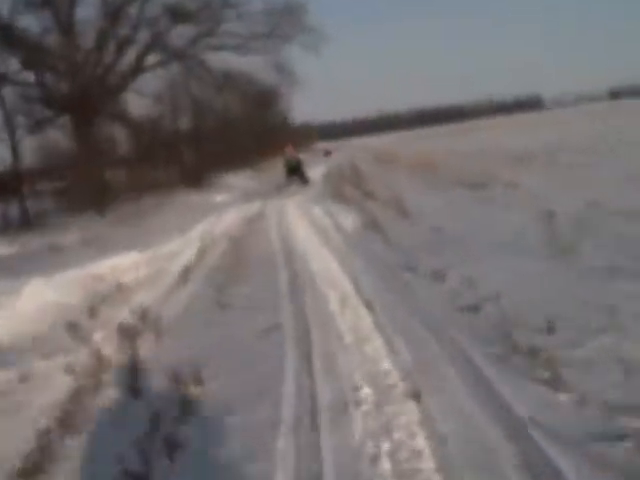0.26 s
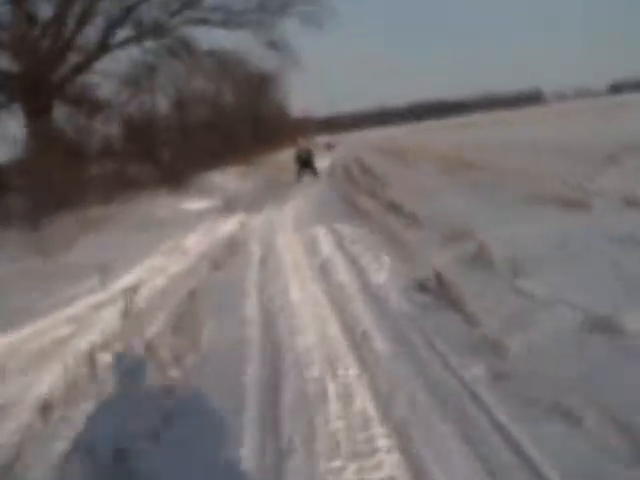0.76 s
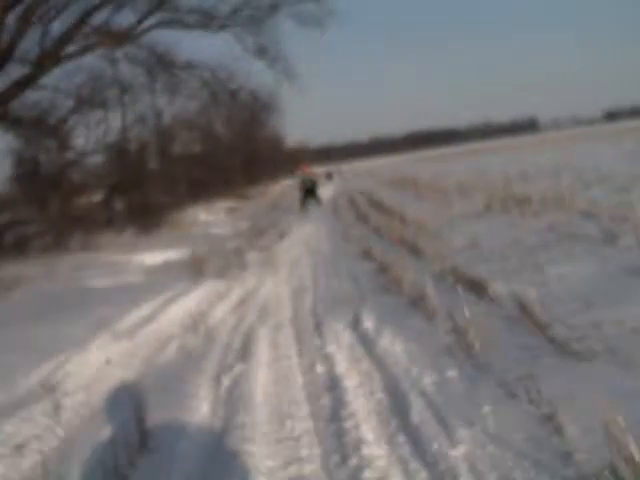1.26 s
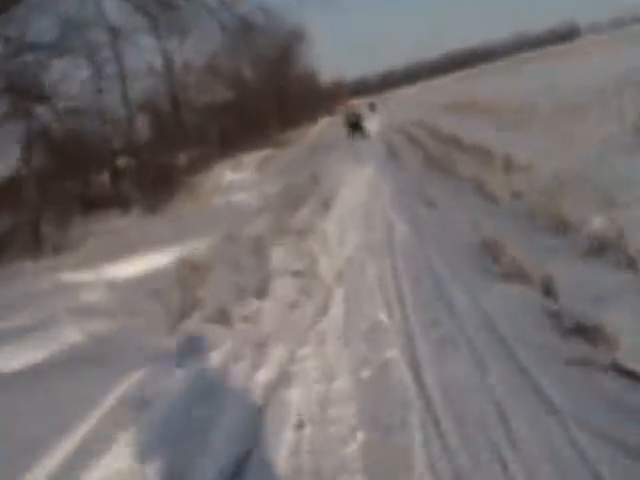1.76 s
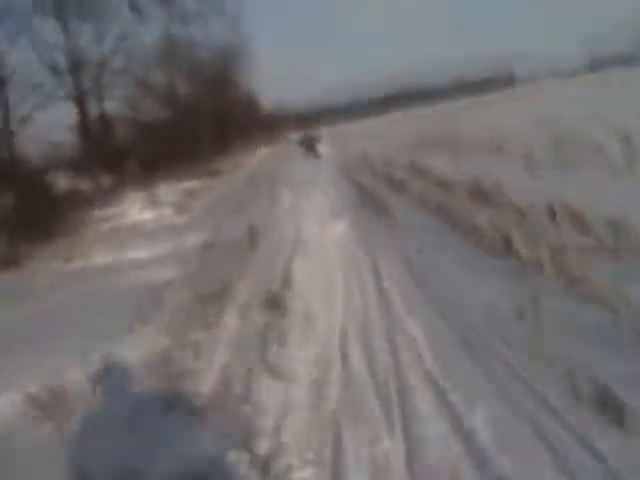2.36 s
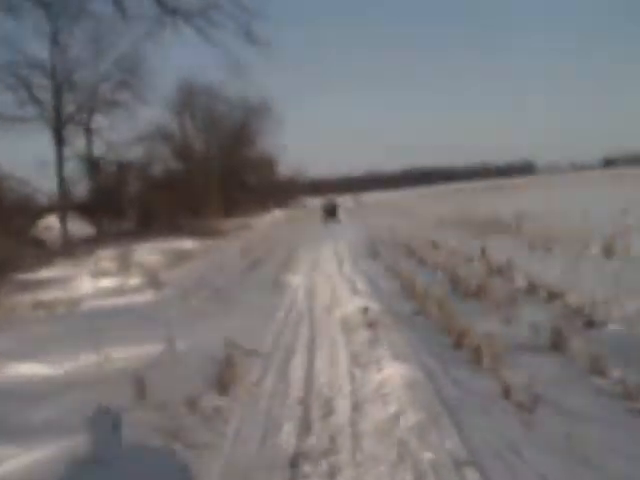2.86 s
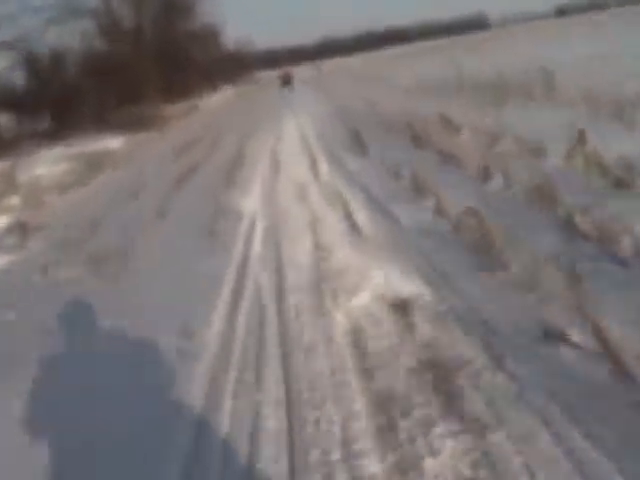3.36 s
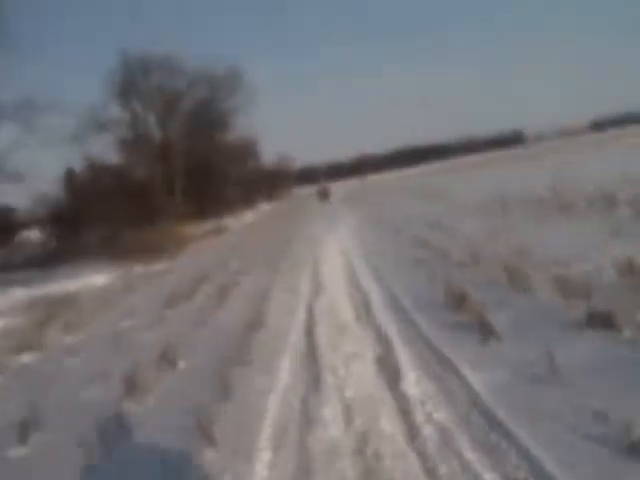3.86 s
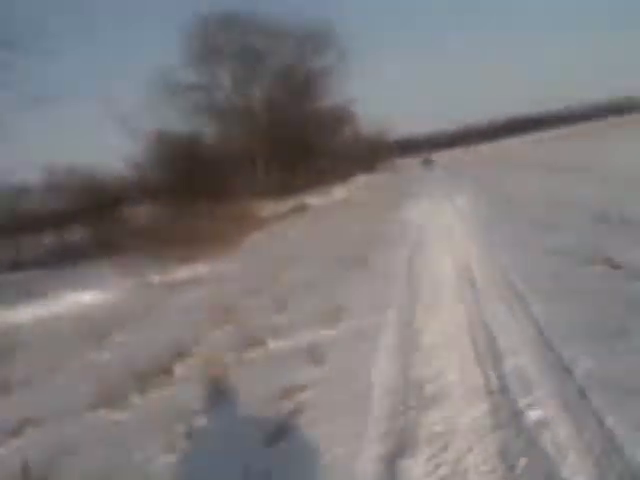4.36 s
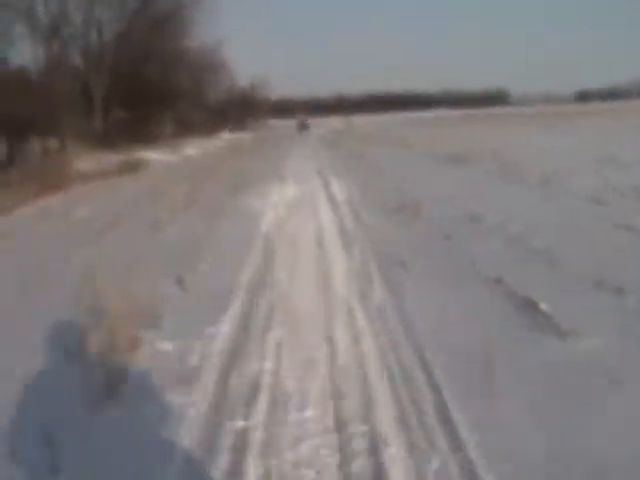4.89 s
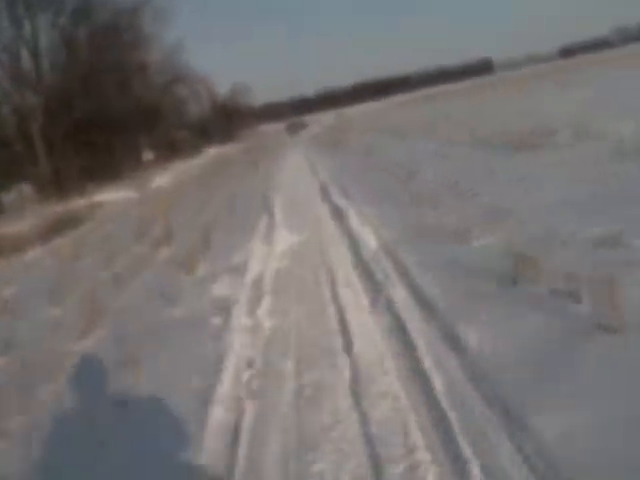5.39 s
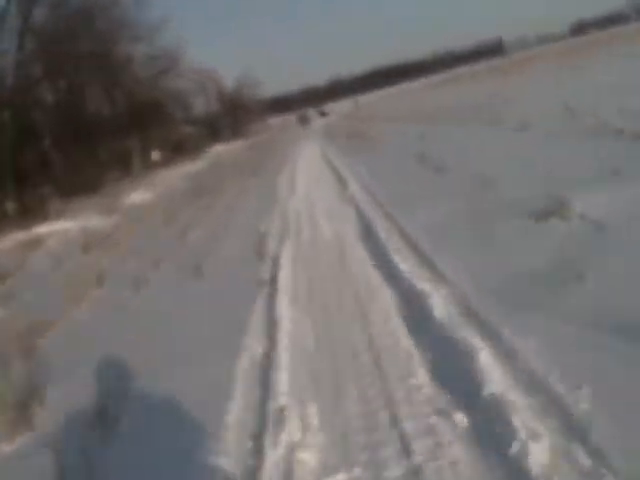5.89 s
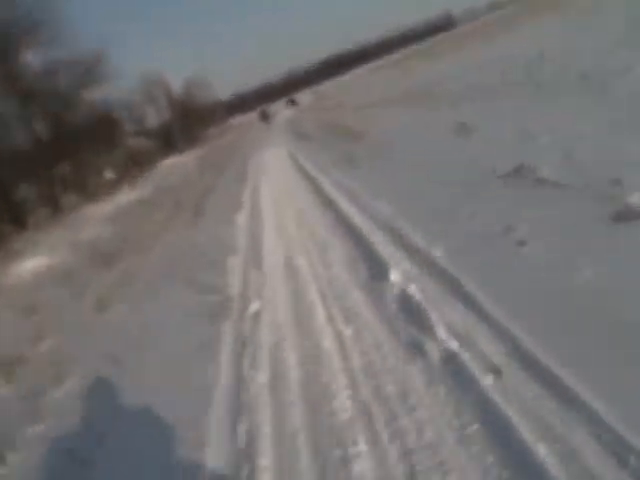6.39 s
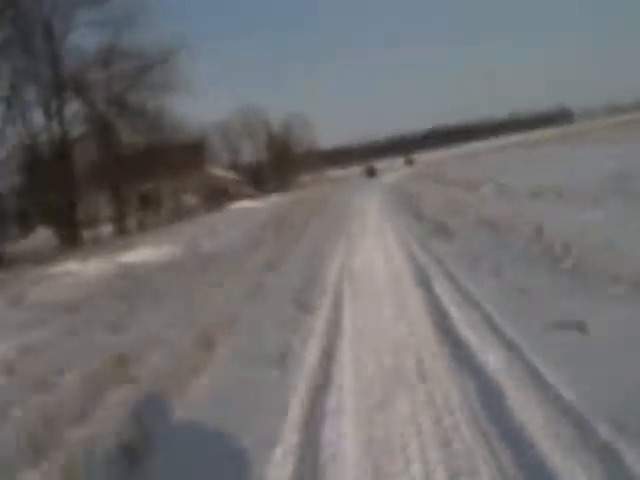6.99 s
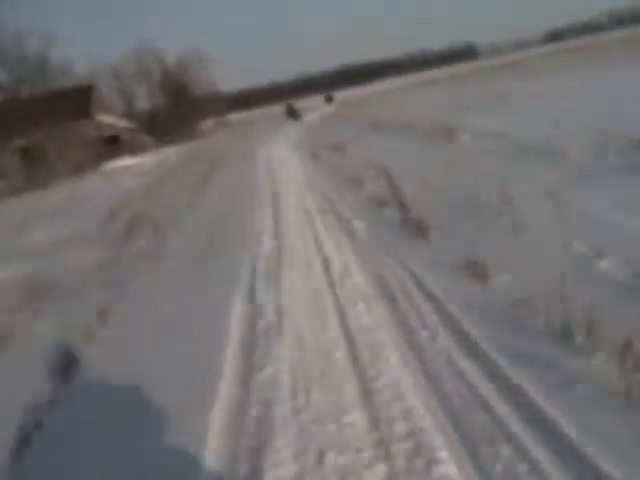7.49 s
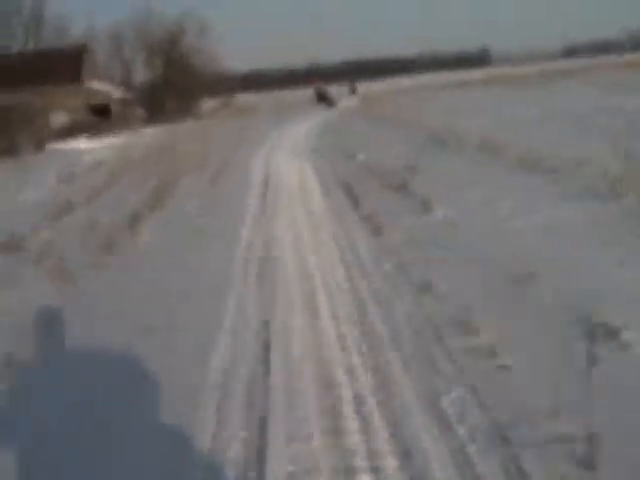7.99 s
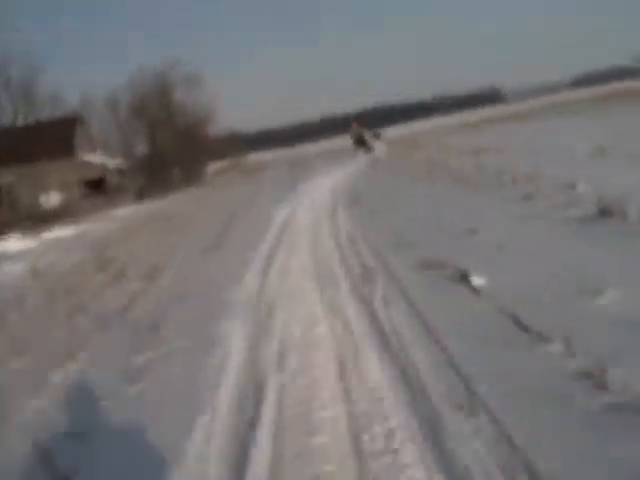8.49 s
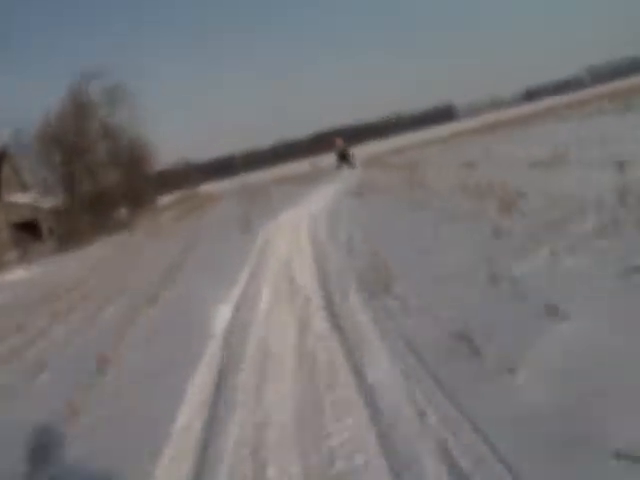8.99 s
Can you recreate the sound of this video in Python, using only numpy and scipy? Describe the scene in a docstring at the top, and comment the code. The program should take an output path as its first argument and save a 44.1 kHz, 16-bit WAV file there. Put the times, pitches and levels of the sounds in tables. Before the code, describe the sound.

Rider's-seat snowmobile: a steady nasal engine drone, low wind buffeting, track whine climbing through two hard revs, then throttle closed and gusty coasting.

```python
"""A rasping two-cylinder two-stroke snowmobile cruises, revs hard twice and coasts, heard from the rider's seat.
The engine is a sum of firing orders on one crank phase, with drive-train noise pulsed at each firing.
Wavering tones make the whine of the track lugs and of the gears; shaken resonators make the bumps.
Coloured noise makes the snow hiss and the wind, which buffets a small microphone with ticks among it.
The recorder's input rounds off the highest peaks and limits the band."""
import sys
import numpy as np
from scipy import signal
from scipy.fft import rfft, irfft, next_fast_len
from scipy.io import wavfile
from scipy.ndimage import uniform_filter1d

SR = 44100
rng = np.random.default_rng(int(sys.argv[2]) if len(sys.argv) > 2 else 0)


def bounce(signal):
    """Save signal as a 16-bit WAV file at the path given by the first command-line argument."""
    frames = np.transpose(np.atleast_2d(signal))
    limited = np.clip(frames, -1, 1)
    pcm = np.round(limited * 32767).astype(np.int16)
    wavfile.write(sys.argv[1], SR, pcm)


N = 407925
STEP = 64  # samples between control values
CONTROL_S = np.arange(0, N + STEP, STEP) / SR

# level of the drive-train rasp, which the snow hiss, buzz and whine octave follow: start_s, level_db
DRIVE_LEVEL = [(0.1, -51.5), (0.57, -48.5), (1.18, -50), (1.87, -53), (2.15, -43.5), (2.36, -42.5),
               (2.42, -48), (3.3, -47), (3.67, -45), (5.3, -46), (5.45, -47), (5.6, -43), (5.72, -45.5),
               (5.92, -45.5), (5.98, -42), (6.1, -42), (6.35, -39), (6.42, -34.5), (6.52, -35.5),
               (6.8, -43), (7.1, -48), (7.68, -47), (7.73, -39.5), (7.87, -40), (7.91, -45), (7.98, -47.5),
               (8.4, -49), (8.55, -49.5), (8.6, -52.5), (8.95, -53), (9.2, -54.5)]
USUAL_DRIVE_DB = -45


def gain_of(db):
    """Logarithmic level: decibels to amplitude."""
    return 10 ** (np.asarray(db) / 20)


def evened(x):
    """Power normalisation: scales to rms 1."""
    return x / np.sqrt(np.mean(x ** 2) + 1e-20)


def fine(control):
    """Linear interpolation from control values to one value per sample."""
    return np.interp(np.arange(N) / STEP, np.arange(len(control)), control)


def curves(rows):
    """Linear interpolation of a table's columns over time, at control rate."""
    s, *columns = np.transpose(rows)
    return [np.interp(CONTROL_S, s, column) for column in columns]


def drive_over_usual():
    """Relative level in dB of the drive-train, a measure of load."""
    return curves(DRIVE_LEVEL)[0] - USUAL_DRIVE_DB


def drift(per_s):
    """Slow random interpolation between independent normal values, of expected rms about 1, at control rate."""
    count = int(N / SR * max(per_s, 1)) + 3
    at = CONTROL_S * SR / (N + STEP) * (count - 1)
    values = np.interp(at, np.arange(count), rng.standard_normal(count))
    return values * np.sqrt(3 / 2)  # interpolation lowers the power to two thirds


def swells(rows, rise_s, fall_s, rest_db):
    """Exponential growth and decay in dB: powers add to a rest; each swell takes rise_s and fall_s per 10 dB."""
    s, peak_db = np.transpose(rows)[..., None]
    late = CONTROL_S - s
    away = np.where(late < 0, -late / rise_s, late / fall_s)
    power = gain_of(peak_db - 10 * away) ** 2
    return 10 * np.log10(gain_of(rest_db) ** 2 + power.sum(0))


def fade(from_s, to_s):
    """Linear gain from zero at from_s to one at to_s, in either direction."""
    return np.clip((np.arange(N) / SR - from_s) / (to_s - from_s), 0, 1)


def colour(points, hz):
    """Spectral envelope: gain at hz on a logarithmic frequency scale, -90 dB beyond its ends."""
    f, db = np.transpose(points)
    return gain_of(np.interp(np.log(hz + 1), np.log(f + 1), db, left=-90, right=-90))


def noise(points, gate=1, from_hz=0):
    """Spectral shaping of white noise, gated first and then coloured, to rms 1 above from_hz."""
    size = next_fast_len(N)
    hz = np.fft.rfftfreq(size, 1 / SR)
    spectrum = rfft(rng.standard_normal(N) * gate, size) * colour(points, hz)
    power = abs(spectrum) ** 2
    share = np.sum(power[hz >= from_hz]) / np.sum(power)
    return evened(irfft(spectrum, size)[:N]) / np.sqrt(share)


def wind():
    """Turbulent pressure: limited slow swings on the membrane, a lumpy roar and gusts that flutter."""
    # roar of the wind: start_s, level_db
    roar_level = [(0.0, -32), (0.35, -37), (0.65, -41), (1.0, -36), (1.8, -36), (2.05, -30), (2.27, -23),
                  (2.37, -27), (2.42, -32), (3.4, -34), (4.6, -33), (4.75, -29.5), (5.6, -33), (6.3, -30),
                  (6.48, -20), (6.62, -29), (6.9, -31), (7.3, -31), (7.45, -27), (7.62, -28), (7.78, -29),
                  (7.87, -24), (7.97, -30), (8.2, -31), (8.64, -35), (8.75, -27), (8.95, -32), (9.2, -30)]
    # spectrum of the slow swings: frequency_hz, density_db (per Hz)
    swing_colour = [(1.2, 4), (3, 6), (4.7, 5), (9, 0), (18, -6.5), (26, -11), (36, -15), (50, -24),
                    (70, -46.5)]
    # spectrum of the roar: frequency_hz, density_db (per Hz)
    roar_colour = [(45, 0.5), (100, -2), (160, -6.5), (300, -12), (500, -18.5), (800, -24), (1500, -35),
                   (3000, -50.5), (5000, -62.5), (7000, -79.5)]
    # buffets that shove the membrane, before its limit: peak_s, peak_db
    buffets = [(0.06, -2), (0.44, -23), (0.67, -21.5), (0.95, -17.5), (1.36, -20), (1.81, -16), (2.1, -17),
               (2.32, -7.5), (2.47, -16), (2.76, -8), (3.06, -11.5), (3.24, -15.5), (3.7, -10),
               (4.03, -11.5), (4.26, -9), (4.72, -13), (5.05, -9), (5.45, -8), (5.94, -14.5), (6.19, -13),
               (6.55, -10.5), (6.86, -14.5), (7.01, -10.5), (7.26, -10), (7.52, -7), (7.67, -13),
               (8.05, -11), (8.21, -11.5), (8.53, -12.5), (8.71, -14.5), (9.05, -14.5)]
    # gusts across the microphone while coasting: peak_s, peak_db
    gust_peaks = [(7.92, -36), (8.121, -24.5), (8.16, -31), (8.27, -37), (8.37, -28.5), (8.43, -29),
                  (8.5, -31), (8.743, -27), (8.79, -31), (8.84, -36), (9.03, -32), (9.12, -33), (9.18, -35)]
    # spectrum of the gusts: frequency_hz, density_db (per Hz)
    flutter_colour = [(120, -0.5), (170, 0.5), (330, -3), (600, -13), (900, -21), (1600, -38), (3000, -46),
                      (4500, -47.5), (6000, -73)]
    membrane = .65  # the farthest the swings push the membrane

    buffet_db = swells(buffets, rise_s=0.21, fall_s=0.17, rest_db=-24)
    swings = noise(swing_colour)
    swings /= np.sqrt(uniform_filter1d(swings ** 2, size=14000) + 0.008)  # the swings never rest for long
    pushed = membrane * np.tanh(fine(gain_of(buffet_db)) * swings / membrane)

    roar_db = curves(roar_level)[0] + 2.65 * drift(30)
    roar = fine(gain_of(roar_db)) * noise(roar_colour)

    gust_db = swells(gust_peaks, rise_s=.008, fall_s=0.071, rest_db=-36) + 2.0 * drift(40)
    gusts = fine(gain_of(gust_db)) * noise(flutter_colour) * fade(7.85, 7.95)
    return pushed + roar + gusts


def ticks():
    """Impulse response: each faint tick is a very short tone burst under a Gaussian envelope."""
    # ticks: start_s, peak_db
    tick_peaks = [(1.916, -42), (1.932, -43), (2.151, -41), (2.169, -31), (2.3717, -32), (2.378, -32),
                  (2.382, -29), (2.388, -40), (2.392, -41), (3.047, -33.5), (5.425, -36), (6.427, -27),
                  (6.562, -24), (6.565, -33), (6.570, -30), (6.574, -29), (7.051, -32), (7.372, -33),
                  (7.485, -34), (8.074, -35)]
    impulses = np.zeros(N)
    s, db = np.transpose(tick_peaks)
    impulses[(s * SR).astype(int)] = gain_of(db)
    u = np.linspace(-.001, .001, 89)  # s
    click = np.cos(2 * np.pi * 3800 * u) * np.exp(-(u / .00006) ** 2)
    return np.convolve(impulses, click, "same")


def snow():
    """Broadband friction noise: spray and sliding skis hiss louder as the drive works harder."""
    # spectrum of the hiss: frequency_hz, density_db (per Hz)
    hiss_colour = [(2500, -5), (3500, -1.5), (4200, -2.5), (5200, 1.5), (6300, -2.5), (7200, -8),
                   (8400, -13), (9000, -14)]
    hiss_db = -66 + 1.21 * drive_over_usual() + .8 * drift(25)
    return fine(gain_of(hiss_db)) * noise(hiss_colour, from_hz=4000)


def gear():
    """Frequency modulation: a faint, thin gear whine that wavers and follows ground speed."""
    # gear whine: start_s, pitch_hz, level_db
    gear_whine = [(0.7, 907, -62.5), (1.0, 905, -50.5), (1.5, 890, -52), (1.8, 870, -61.5), (3.2, 825, -60),
                  (3.45, 848, -54), (3.9, 868, -52), (4.3, 895, -56), (4.62, 906.5, -53), (4.9, 941, -54),
                  (5.4, 930.7, -53), (5.55, 940.4, -70)]
    hz, whine_db = curves(gear_whine)
    phase = 2 * np.pi * np.cumsum(fine(hz * (1 + .003 * drift(20)))) / SR
    whine = np.sqrt(2) * fine(gain_of(whine_db + 2.5 * drift(9))) * np.cos(phase)
    return whine * fade(.6, 0.8) * fade(5.6, 5.55)


def chassis():
    """Modal resonance: lumpy shaking on rough snow rings the low panel modes."""
    # chassis bumps: peak_s, peak_db
    bumps = [(1.3, -30), (1.42, -28.5), (1.81, -27), (1.94, -33.5), (2.09, -21.5), (2.18, -22),
             (2.27, -22.5), (2.38, -27), (2.49, -30.5), (2.61, -29.5), (2.75, -31), (3.36, -43),
             (4.52, -24.5), (5.09, -29), (5.26, -29)]
    # panel modes: frequency_hz, width_hz (of each of two filter passes), level_db (relative)
    modes = [(221, 42, 10.5), (275, 49, -7)]
    shake = rng.standard_normal(N) * fine(gain_of(2.5 * drift(25)))
    ring = 0
    for hz, width, db in modes:
        b, a = signal.iirpeak(hz, hz / width, SR)
        once = signal.lfilter(b, a, shake)
        ring = ring + gain_of(db) * evened(signal.lfilter(b, a, once))
    bump_db = swells(bumps, rise_s=0.033, fall_s=0.08, rest_db=-48)
    return fine(gain_of(bump_db)) * evened(ring) * fade(.9, 0.94) * fade(5.6, 5.4)


def track():
    """Periodic contact: lugs passing the drive sprocket give a wavering whine and its octave."""
    # track lugs: start_s, pitch_hz (lug rate), level_db (of the whine)
    lugs = [(0.06, 190.9, -37), (0.5, 200.9, -40), (1.2, 206.7, -39), (1.75, 197.8, -36), (2.5, 191.5, -30),
            (2.9, 189.2, -30.5), (3.4, 192.1, -40), (4.1, 204.4, -36.5), (4.7, 215.2, -46),
            (5.5, 220.7, -35.5), (5.8, 243, -44), (6.0, 247.5, -33), (6.35, 298.6, -22),
            (6.7, 348.5, -29.5), (6.9, 353.7, -27), (7.2, 314.6, -32.5), (7.5, 314, -41), (7.85, 365, -30),
            (8.05, 326.6, -37.5), (8.4, 314.5, -35.5), (8.7, 290.4, -48)]
    hz, whine_db = curves(lugs)
    octave_db = -41 + 1.3 * drive_over_usual()
    octave_db = octave_db - 0.17 * np.maximum(hz - 215, 0)  # dB per Hz of lug rate above 215 Hz
    phase = 2 * np.pi * np.cumsum(fine(hz * (1 + 0.0039 * drift(30)))) / SR
    whine = fine(gain_of(whine_db + 2.6 * drift(12))) * np.cos(phase)
    octave = fine(gain_of(octave_db + 2.6 * drift(9.2))) * np.cos(2 * phase)
    return np.sqrt(2) * (whine + octave) * fade(8.7, 8.5)


def rasp(turns, running):
    """Amplitude modulation: drive-train noise puffs at each firing, more deeply under load."""
    # spectrum of the rasp: frequency_hz, density_db (per Hz)
    rasp_colour = [(200, -1), (400, -0.5), (600, -5.5), (900, -7.5), (1300, -11), (1700, -13.5),
                   (2150, -17), (2300, -20), (2600, -22.5), (3200, -30.5), (3800, -45.5), (4500, -61.5)]
    puff = .3  # decay of each puff, in firing intervals
    depth = fine(np.clip(0.2 + .035 * drive_over_usual(), 0, 1)) * running
    pulse = np.exp(-(turns % 1) / puff) / puff
    gate = 1.5 + depth * (pulse - 1)
    rasp_db = curves(DRIVE_LEVEL)[0] - 1 + 1.2 * drift(14)
    return fine(gain_of(rasp_db)) * noise(rasp_colour, gate, from_hz=1150)


def missed():
    """Interrupted excitation in dB: a short rounded dip at each missed firing; depth 0 leaves the level unchanged."""
    # missed firings: middle_s, length_s, depth_db (0 for no dip)
    misfires = [(1.675, .017, -5), (1.82, .02, -11), (2.074, .022, -12), (2.175, 0.012, -13),
                (2.68, 0.013, -9), (3.666, .012, 0), (5.08, .011, -16), (5.275, .01, -10),
                (6.222, .025, -2.5)]
    s, length, depth_db = np.transpose(misfires)[..., None]
    late = (CONTROL_S - s) / length
    return (depth_db * np.exp(-(2 * late) ** 4)).sum(0)


def tone_spells():
    """Time-varying source spectrum: gains and tilts that hold through each spell of changed engine tone."""
    # spells of changed engine tone: start_s, end_s, onset_s, bark_db, buzz_db, boom_db, third_order_db,
    # bark_tilt_db_per_khz, snarl_db_per_khz
    spells = [(0.0, 0.39, 0.097, 7.5, 4, -0.5, -1, 4, 0), (1.872, 1.925, .015, 5.5, -6, 4, -3, -5, 0),
              (1.945, 2.066, .015, 9.5, -5, 10, -2, -5, 0), (3.095, 3.657, .02, 7, 3, -3.5, 0, 5, -1),
              (4.951, 5.457, 0.1, 2, -2.5, -1.5, 0, 8, -3.5),
              (5.48, 5.565, 0.084, 5.5, 0.5, -2, -2.5, 3, -3), (5.613, 5.74, 0.044, 7.5, -5, -1, -2, 7, 1),
              (5.8, 5.94, .06, 3.5, -2, 0, -2.5, -12, 2), (5.951, 6.205, 0.054, 5, 3, -2.5, -1.5, -8, 1),
              (6.236, 6.373, .05, 3.5, 4, 3, 0.5, -29, -6), (6.386, 6.6, .08, 4, 8, 1.5, 1, -1, 0.5),
              (6.62, 7.002, 0.075, 0, 1.5, 2, 0.5, -14, 0), (7.18, 7.5, .08, 1.5, 4, 1.5, 1, 3, 0),
              (7.717, 7.905, .05, 5, 9.5, -0.5, -1.5, 45.5, 0)]
    start, end, onset_s, *changes = np.transpose(spells)[..., None]
    begins = (CONTROL_S - start) / onset_s + .5
    ends = (end - CONTROL_S) / 0.02 + .5  # each spell ends within 0.02 s
    amount = np.clip(np.minimum(begins, ends), 0, 1)
    return [(change * amount).sum(0) for change in changes]


def firing_orders(turns, hz, exhaust_db, bark_db):
    """Fourier series on the firing phase: whole orders, and half orders from unequal cylinders."""
    # colour of the upper orders, over the bark low down and over the buzz high up: frequency_hz, level_db
    bark_colour = [(550, -3), (750, -9), (880, -10.5), (960, -1.5), (1050, -2.5), (1140, -1), (1230, -6),
                   (1400, -6.5), (1500, -6.5), (1650, -7.5), (1780, -5.5), (1870, -9.5), (1980, -9),
                   (2110, -6), (2200, -9), (2300, -21), (2600, -25.5), (2850, -20.5), (3100, -27),
                   (3300, -26), (3550, -27.5), (3900, -28), (4500, -34), (5500, -49)]
    # what the exhaust pipe makes of the three lowest orders: frequency_hz, level_db
    pipe_colour = [(60, -7), (160, -6), (183, 4), (205, 6), (250, 9), (320, 0.5), (365, 1.5), (420, -2),
                   (485, 1.5), (545, -3.5), (650, -9), (900, 0.5)]
    # strength of half orders 0.5, 1.5, 2.5 .., the last value for the rest: level_db (relative)
    halves = [-10.5, -3.5, -1.5, 5, -1, -2.5, -6.5, 0.5, 1.5, 10.5, 10, -2, 0.5, 5, -1]
    # panels that ring with the half orders: frequency_hz, level_db
    half_ring = [(60, 0), (1150, 1), (1350, 0.5), (1500, 0.5), (1700, 3.5), (1900, 7), (2050, -2.5),
                 (2250, 0.5), (2430, 0.5), (2650, -1), (9000, 1)]
    # moments of most uneven firing, which lift the half orders: peak_s, peak_db (over the whole orders)
    uneven = [(2.2, -14), (5.65, -9), (6.0, -13), (6.28, -14), (6.43, -6), (6.48, -6.5), (7.72, -4.5),
              (7.77, -3.5), (7.86, -8)]
    # unevenness between those moments: start_s, level_db (over the whole orders)
    uneven_rest = [(0, -17), (5.45, -17), (5.6, -9.5), (6.2, -12.5), (6.3, -18.5), (6.6, -18.5),
                   (6.95, -13.5), (7.1, -11), (7.4, -11.5), (7.6, -16), (7.9, -16)]
    # wandering part of each order in strength and phase: order, share (0-1, before any steadying)
    wander = [(1, .3), (3, .3), (4, .75), (5, .7), (6, .2), (8, .25), (9, .5), (11, .45), (12, .4),
              (13, .85), (14, .95)]

    # the buzz follows bark and drive level, dB per dB
    buzz_db = -46 + 0.55 * (bark_db + 35) + 0.71 * drive_over_usual()
    uneven_db = swells(uneven, rise_s=0.042, fall_s=0.026, rest_db=curves(uneven_rest)[0])
    more_bark_db, more_buzz_db, more_boom_db, more_third_db, tilt, snarl = tone_spells()
    dips_db = missed()
    bark_db = bark_db + more_bark_db + dips_db
    buzz_db = buzz_db + more_buzz_db + dips_db
    unsteady = np.interp(hz, [185, 205], [1, .45])  # orders steady as the firing rate climbs

    half_turn = np.exp(1j * np.pi * turns)  # one crank turn holds two firings
    spin, tones = np.ones(N), np.zeros(N)
    for order in np.arange(1, 48) / 2:
        spin = spin * half_turn
        order_hz = order * hz
        above_twelfth = max(order - 12, 0)
        if order <= 3:  # the pipe colours these; a half order goes with the whole one above
            level_db = exhaust_db + (order <= 1) * more_boom_db + (order > 2) * more_third_db
            gain = colour(pipe_colour, np.ceil(order) * hz) * gain_of(level_db + 1.5 * drift(7))
        else:
            above = np.clip((order_hz - 1250) / 350, 0, 1)
            below = np.clip((960 - order_hz) / 240, 0, .5)  # under the intake resonance the pipe takes a share
            level_db = (1 - above - below) * bark_db + above * buzz_db + below * (exhaust_db - 4.0)
            # the bark tilts about 1100 Hz
            level_db = level_db + (1 - above) * tilt * (np.clip(order_hz, 800, 1500) - 1100) / 1000
            level_db = level_db - 1.5 * above_twelfth  # the highest orders are weak
            level_db = level_db + snarl * np.clip(order_hz - 2600, 0, 1500) / 1000
            waver_db = .8 * min(order / 6, 3 / 2) * drift(8)
            gain = colour(bark_colour, order_hz) * gain_of(level_db + waver_db)
        if order % 1:
            half_db = halves[min(int(order), len(halves) - 1)] + uneven_db + 3.5 * drift(8)
            gain = gain * colour(half_ring, order_hz) * gain_of(half_db)
        share = np.interp(order, *np.transpose(wander), left=0)
        share = share * (unsteady if order <= 8.5 else 1)
        per_s = 9 + 3 * above_twelfth  # faster wandering above the twelfth order
        wandering = (drift(per_s) + 1j * drift(per_s)) / np.sqrt(2)
        gain = gain * (np.sqrt(1 - share ** 2) + share * wandering)
        spread = np.exp(.4j * order ** 1.8)  # the pipe spreads each pulse in time
        tones += (fine(gain) * spin * spread).real
    return np.sqrt(2) * tones


def engine():
    """Common phase: firing orders and pulsed rasp follow the same slightly jittering crank."""
    # engine: start_s, pitch_hz (firing rate), exhaust_db, bark_db (intake, before the spells of changed tone)
    engine_course = [(0.06, 170.4, -38.5, -44.5), (0.46, 183.9, -35.5, -47), (0.93, 179.4, -38.5, -42.5),
                     (1.19, 175.6, -38.5, -44), (1.57, 162, -37.5, -47.5), (1.8, 157.3, -39, -52.5),
                     (2.04, 162.3, -35.5, -45), (2.13, 161.2, -26, -39), (2.35, 161.2, -29.5, -37),
                     (2.5, 160.3, -33, -47.5), (2.9, 160.5, -31.5, -42), (3.31, 171.1, -31.5, -38.5),
                     (3.77, 181, -31, -36.5), (4.2, 182.8, -31, -37), (4.78, 179.1, -32.5, -40.5),
                     (5.47, 174.1, -32.5, -32.5), (5.6, 194, -26.5, -39.5), (5.7, 209.4, -27, -39.5),
                     (5.89, 197.8, -29.5, -43), (6.0, 204.7, -23, -38), (6.22, 232.6, -25, -36.5),
                     (6.45, 249, -24, -28), (6.52, 257.5, -25, -29.5), (6.65, 261.3, -25, -22),
                     (6.91, 246.1, -28.5, -31), (7.09, 224.3, -33.5, -45.5), (7.22, 219.8, -34, -43),
                     (7.45, 213.9, -37.5, -47), (7.56, 216, -34, -39), (7.74, 242.5, -33.5, -46.5),
                     (7.85, 254.8, -28.5, -45), (7.96, 225.4, -41, -55), (8.05, 204.5, -41, -50)]
    hz, exhaust_db, bark_db = curves(engine_course)
    turns = np.cumsum(fine(hz * (1 + .001 * drift(40)))) / SR  # counted in firings
    running = fade(8.05, 7.93)  # the throttle shuts
    return running * firing_orders(turns, hz, exhaust_db, bark_db) + rasp(turns, running)


def scene():
    """Superposition: machine and wind add at the microphone."""
    return (wind() + ticks() + snow() + gear() + chassis() + track() + engine())[None]


def record(dry):
    """Saturation and band limiting: peaks round off, a very faint wavering tone adds, treble is cut."""
    whine = gain_of(-93.5 + 4.0 * fine(drift(6))) * np.sin(2 * np.pi * 8000 * np.arange(N) / SR)
    top, knee = .73, 10.5  # top: full-scale parts; knee: sharpness
    rounded = dry / (1 + abs(dry / top) ** knee) ** (1 / knee) + whine
    lowpass = signal.firwin(1023, 8550, window=("kaiser", 9), fs=SR)  # recorder's band limit, Hz
    return signal.oaconvolve(rounded, lowpass[None], "same")


dry = scene()
out = record(dry)
bounce(out)
```